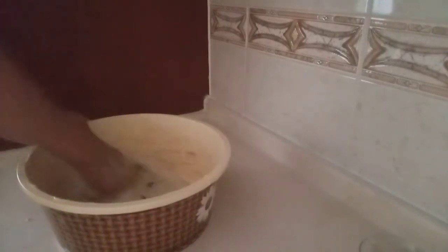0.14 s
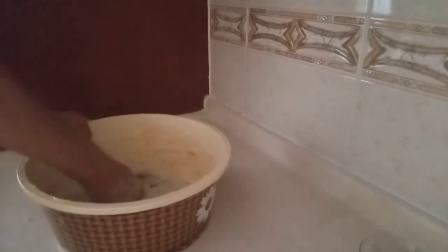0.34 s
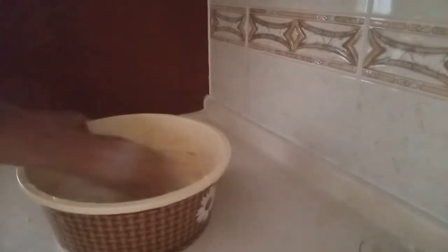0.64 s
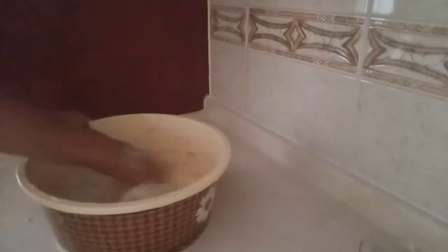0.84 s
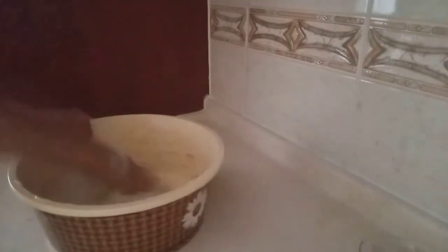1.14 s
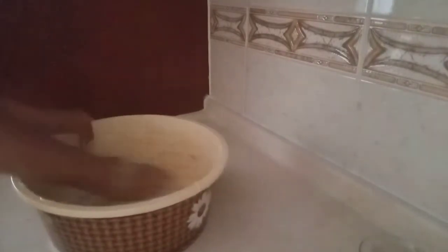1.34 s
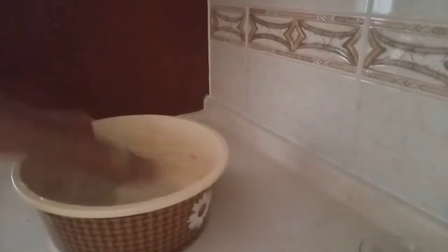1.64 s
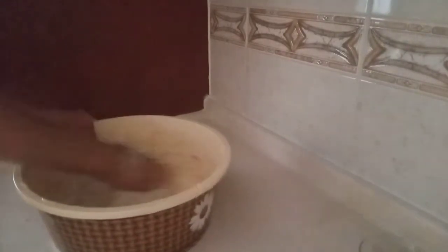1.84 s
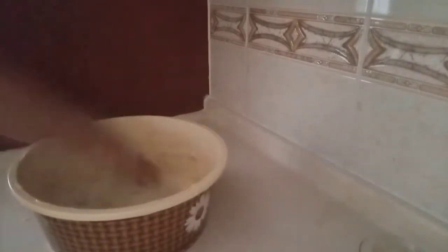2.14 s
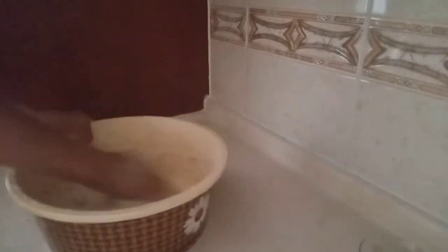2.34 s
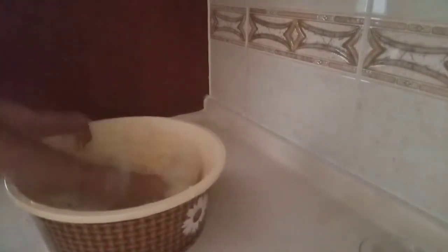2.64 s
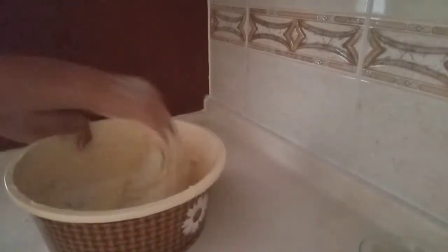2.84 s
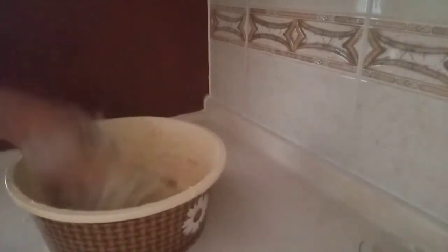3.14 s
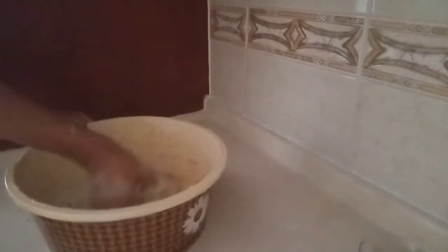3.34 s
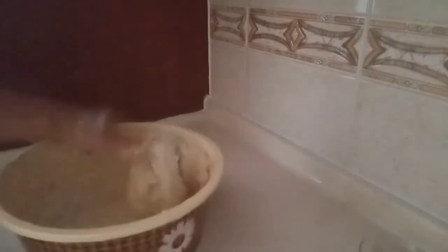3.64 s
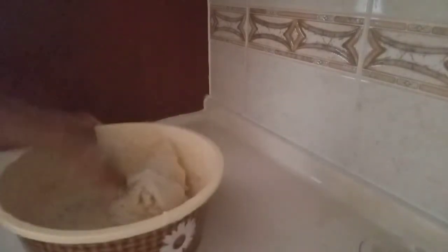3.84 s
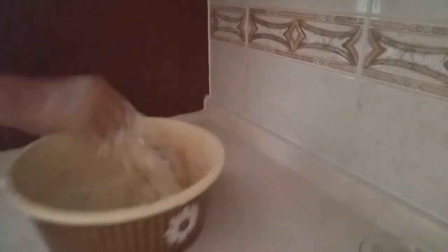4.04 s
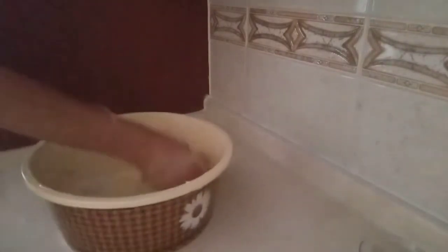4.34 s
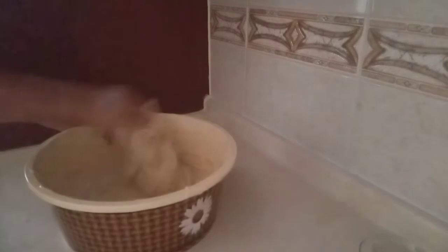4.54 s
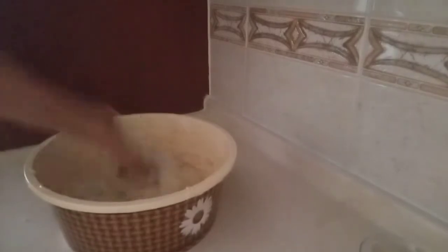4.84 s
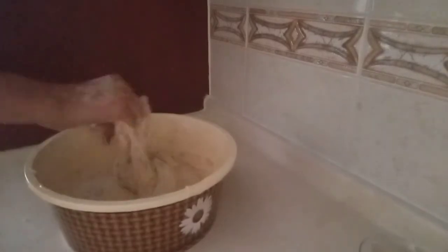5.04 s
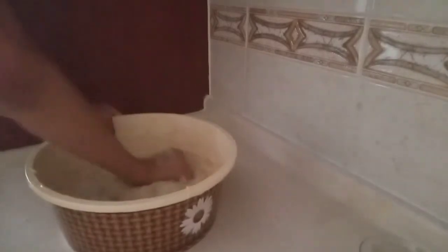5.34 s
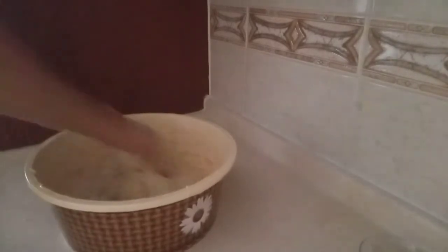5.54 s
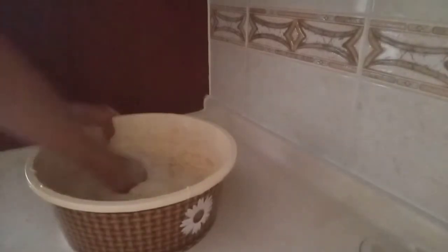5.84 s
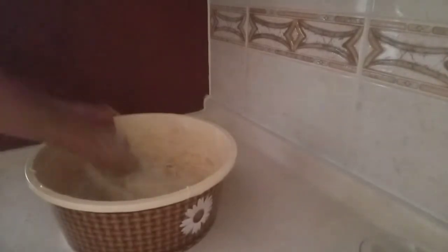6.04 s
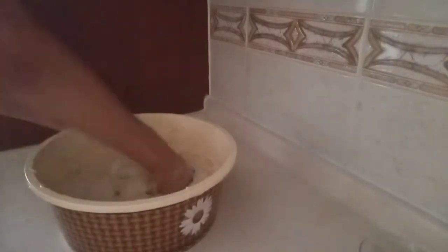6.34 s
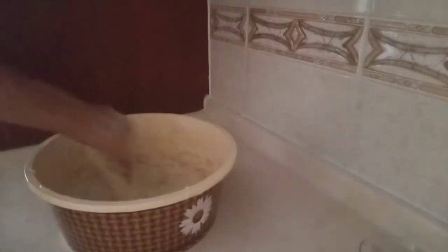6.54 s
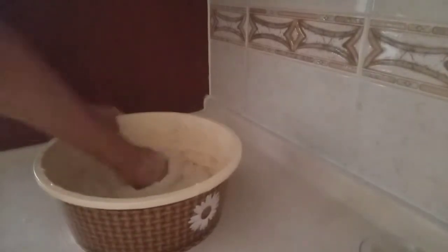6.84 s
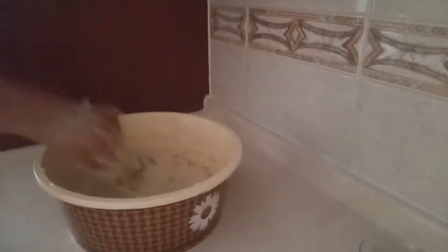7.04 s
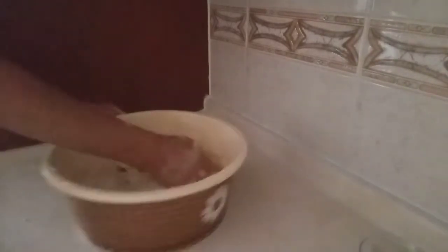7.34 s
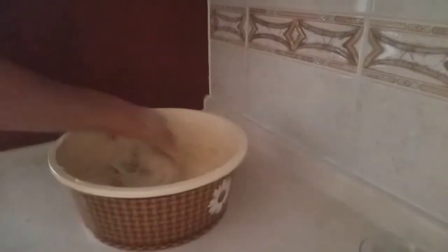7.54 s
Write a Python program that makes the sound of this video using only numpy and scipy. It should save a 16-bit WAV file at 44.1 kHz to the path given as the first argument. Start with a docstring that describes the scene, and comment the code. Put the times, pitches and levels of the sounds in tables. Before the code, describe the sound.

A hand kneads sticky dough in a plastic bowl on a kitchen counter. Presses make low, dull thuds and slaps knock hollowly on the bowl at an uneven pace, with soft, tacky rasping between them. One loud slap comes just after the start and the loudest near the middle, then the work goes on more gently. The microphone is a step away, and the quiet tiled room rings briefly.

```python
"""Kneading dough in a plastic bowl

A hand slaps, presses and drags sticky dough in a bowl on a kitchen counter, a step from a phone.
Dough rasps along the plastic, presses thud through the counter, slaps ring the wall, and the wall
judders as the lump peels off. The tiled kitchen rings briefly over a quiet floor and a few faint hisses."""
import sys
import numpy as np
from scipy import signal
from scipy.fft import rfft, irfft, next_fast_len
from scipy.io import wavfile
from scipy.ndimage import uniform_filter1d

SR = 44100
rng = np.random.default_rng(int(sys.argv[2]) if len(sys.argv) > 2 else 0)


def output_pcm(signal):
    """Save a mono or channel-first signal as 16-bit PCM at the path in sys.argv[1].

    Samples are clipped to [-1, 1] before scaling.
    """
    pcm = np.clip(np.atleast_2d(signal).T, -1, 1) * 32767
    wavfile.write(sys.argv[1], SR, np.round(pcm).astype(np.int16))


N = 339129


def undb(db):
    """Gain of a level in dB."""
    return 10 ** (np.asarray(db) / 20)


def unit(x):
    """Scales x to rms 1."""
    return x / np.sqrt(np.mean(x ** 2))


def eq(x, points):
    """Shapes x by (freq_hz, gain_db) points joined on a log-frequency axis."""
    size = next_fast_len(len(x) + 4096)
    hz, db = np.transpose(points)
    bins_hz = np.arange(size // 2 + 1) * SR / size
    gain = undb(np.interp(np.log(bins_hz + 1), np.log(hz), db))
    return irfft(rfft(x, size) * gain, size)[:len(x)]


def wander(rate_hz):
    """Smooth random modulation at rms 1."""
    hold = int(SR / rate_hz)
    steps = np.repeat(rng.standard_normal(N // hold + 1), hold)
    return unit(uniform_filter1d(uniform_filter1d(steps, hold), hold)[:N])


def ring(modes, extra_db):
    """Decaying sines of tapped (pitch_hz, level_db, t60_s) modes, each raised by extra_db."""
    hz, db, t60 = np.transpose(modes)[:, :, None]
    t = np.arange(SR // 3) / SR
    partials = np.sin(2 * np.pi * hz * t) * np.exp(-np.log(1000) * t / t60) * (1 - 3 * t)
    return undb(db[:, 0] + extra_db) @ partials


def focus_db(hz, centre_hz, db_per_octave):
    """Modes far from the struck centre ring less."""
    return -db_per_octave * np.abs(np.log2(hz / centre_hz))


def add(out, start_s, x, peak_db):
    """Mixes x in at start_s with the given peak."""
    i = int(max(start_s, 0) * SR)
    out[i:i + len(x)] += (x * undb(peak_db) / np.abs(x).max())[:N - i]


def flicker(x, depth_db, rate_hz):
    """Splits x into half-octave bands whose levels waver independently."""
    edges_hz = 500 * 2 ** np.arange(0, 5.5, .5)
    band = np.digitize(np.arange(N // 2 + 1) * SR / N, edges_hz)
    spectrum = rfft(x)
    return sum(irfft(spectrum * (band == k), N) * undb(depth_db * wander(rate_hz))
               for k in range(len(edges_hz) + 1))


def rough_notes(rows, width_hz, harmonics):
    """Short notes whose harmonics are each smeared over a band."""
    out = np.zeros(N)
    blurs = [(1 + wander(width_hz)) / (k + 1) for k in range(harmonics)]
    for start_s, length_s, pitch_hz, level_db in rows:
        i, size = int(start_s * SR), int(length_s * SR)
        phase = 2 * np.pi * pitch_hz * np.arange(size) / SR
        note = sum(np.sin((k + 1) * phase) * blur[i:i + size] for k, blur in enumerate(blurs))
        out[i:i + size] += undb(level_db) * note * signal.windows.tukey(size, .2)
    return out


# Drags along the wall; weight leans on the bowl, sizzle is the wet film's treble:
# peak_s, level_db, swell_s, fade_s, weight_db, sizzle_db
STROKES = [(0.0, -52, .02, 0.076, 12.5, -9), (0.151, -66.5, 0.068, 0.26, 0.5, -7.5),
           (0.239, -58.5, 0.015, 0.13, 3, 0), (0.444, -57.5, 0.081, 0.21, 2.5, 0.5),
           (0.917, -50, 0.17, 0.085, 0.5, -7), (1.091, -51.5, 0.05, 0.15, -1, -15),
           (1.197, -51, 0.14, 0.052, -22, 0.5), (1.34, -49.5, 0.08, 0.15, 2, -5),
           (1.588, -48, 0.026, 0.092, 13.5, -11), (1.683, -50, 0.082, 0.081, -15, 0),
           (1.833, -51, 0.046, 0.085, 5.5, -6), (1.943, -51.5, 0.15, 0.085, 1.5, -5),
           (2.083, -41, 0.011, 0.11, 5, -25), (2.18, -54, 0.11, 0.086, -12, 11),
           (2.37, -46.5, 0.044, 0.1, 5.5, 1), (2.619, -48, 0.025, 0.079, 5.5, -6.5),
           (3.12, -76, 0.54, 0.7, -1, 4.5), (3.363, -58, 0.19, 0.66, 0.5, -3),
           (3.598, -45, 0.041, 0.12, -17, -26), (3.716, -53.5, 0.018, 0.094, 26, -27),
           (4.053, -52.5, 0.24, 0.081, 1.5, -5), (4.205, -55.5, 0.024, 0.13, 2.5, 1),
           (4.3, -51.5, 0.12, 0.23, -7.5, -9), (4.525, -63, 0.12, 0.047, -11.5, -6),
           (4.689, -57, 0.14, 0.19, 7, -7.5), (4.86, -62, 0.023, .05, -13.5, 9.5),
           (4.915, -67.5, 0.05, 0.07, -11, 15.5), (5.276, -58.5, 0.02, 0.17, 0, 9),
           (5.507, -64, 0.14, 0.18, 3, 2.5), (5.778, -68, 0.056, 0.16, 7, 0),
           (6.011, -56, 0.061, 0.081, 5.5, 4.5), (6.254, -55.5, 0.026, 0.083, 10, -2.5),
           (6.31, -58.5, 0.13, 0.18, 2, 6), (6.485, -61, 0.048, 0.055, -12, 12),
           (6.727, -58.5, 0.011, 0.077, 1.5, -1), (6.809, -47, 0.035, 0.11, 2.5, -1),
           (6.982, -54, 0.059, 0.044, -12, 7), (7.104, -66.5, 0.06, 0.11, -2.5, -3),
           (7.284, -58, .03, 0.18, 15.5, -21.5), (7.37, -51, 0.067, 0.22, -8.5, -6.5),
           (7.6, -65, 0.21, 0.06, -2, -9.5)]


def stroke_curves():
    """Level, weight and sizzle in dB: strokes swell, fade and add up, the louder setting the colour."""
    span_db, swell_curve, fade_curve = 20, 1.43, 1.08  # curves above 1 round the top
    peak_s, level_db, swell_s, fade_s, *colours = np.transpose(STROKES)[:, :, None]
    t = np.arange(0, N, 32) / SR
    rising = t < peak_s
    distance = np.abs(t - peak_s) / np.where(rising, swell_s, fade_s)
    drop_db = span_db * distance ** np.where(rising, swell_curve, fade_curve)
    power = undb(np.maximum(level_db - drop_db, -200)) ** 2
    total = power.sum(axis=0)
    curves = [10 * np.log10(total)] + [(power * c).sum(axis=0) / total for c in colours]
    return (np.interp(np.arange(N) / SR, t, c) for c in curves)


def rub(resonance, rate_hz):
    """Uneven friction noise keeps a body ringing."""
    friction = rng.standard_normal(N) * undb(4 * wander(rate_hz))
    return unit(signal.fftconvolve(friction, resonance)[:N])


# Tone of dough tearing off plastic: freq_hz, gain_db
RASP_EQ = [(180, -22), (300, -14), (658, -4), (975, -7.5), (1970, -9.5), (4120, -17), (6300, -32.5),
           (8700, -24), (10600, -36), (13800, -37), (15500, -41)]


def dough_drag():
    """Sticky strands tear in dense ticks; the same rubbing shakes bowl and counter."""
    pops_per_s, pop_db = 130, 14  # trapped air bursting out of the dough
    level_db, weight_db, sizzle_db = stroke_curves()
    ticks = rng.standard_normal(N) * undb(2 * np.minimum(rng.exponential(size=N), 5) + 1.9 * wander(32))
    ticks *= np.where(rng.random(N) < pops_per_s / SR, undb(pop_db), 1)
    rasp = unit(flicker(eq(ticks, RASP_EQ), depth_db=2.5, rate_hz=25))
    sizzle = eq(rasp, [(2500, -33), (4500, -6)])
    rasp += (undb(sizzle_db) - 1) * sizzle
    tilt_db = -8 * np.log2(np.array(WALL_MODES)[:, 0] / 400)
    wall = undb(weight_db) * rub(ring(WALL_MODES, tilt_db), rate_hz=60)
    counter = undb(0.48 * weight_db - 0.5) * rub(ring(COUNTER_MODES, 0), rate_hz=30)
    return undb(level_db) * (undb(4.5) * rasp + wall + counter)


# Low ring of the counter and bowl bottom: pitch_hz, level_db, t60_s
COUNTER_MODES = [(77, 7.5, 0.18), (114, 8, 0.15), (175, 11, 0.085), (263, 8.5, 0.1)]
# Presses of the palm: start_s, level_db, centre_hz
PRESSES = [(0.018, -29.5, 114), (0.147, -29, 98), (0.291, -18, 184), (0.763, -36, 114), (0.944, -39, 116),
           (1.091, -32, 80), (1.363, -25, 163), (1.58, -21, 82), (1.826, -27, 120), (1.945, -30, 103),
           (2.091, -21, 76), (2.32, -37, 124), (2.421, -36.5, 175), (2.616, -30, 76), (3.149, -45, 113.6),
           (3.22, -28.5, 175), (3.577, -13.5, 188), (3.718, -21.5, 127), (4.226, -25.5, 127),
           (4.668, -32.5, 99), (4.697, -28.5, 96.9), (4.779, -35, 120.6), (5.292, -35.5, 89),
           (5.34, -31.5, 115.7), (5.418, -26.5, 123.4), (5.772, -35, 112.2), (5.925, -28.5, 125.6),
           (6.007, -33.5, 76), (6.253, -28, 181), (6.403, -31.5, 113), (6.746, -24, 174), (6.856, -28, 114),
           (7.262, -24.5, 138)]


def counter_thuds():
    """A soft push of the palm sets the counter's low modes going; longer pushes thud deeper."""
    out, hz = np.zeros(N), np.array(COUNTER_MODES)[:, 0]
    for start_s, level_db, centre_hz in PRESSES:
        cycles = np.arange(int(1.45 * SR / centre_hz)) * centre_hz / SR
        push = np.hanning(len(cycles)) * np.sin(2 * np.pi * (cycles + rng.random()))
        # the bowl sits loosely, so pitch and decay vary
        modes = COUNTER_MODES * (1 + [.05, 0, .2] * rng.uniform(-1, 1, (len(hz), 3)))
        boom = ring(modes, focus_db(hz, centre_hz, db_per_octave=3.7))
        add(out, start_s, signal.fftconvolve(push, boom), level_db - 2)
    return out


# Ring of the plastic wall: pitch_hz, level_db, t60_s
WALL_MODES = [(362.5, 2.5, 0.051), (413, 2.5, 0.2), (520, 11, 0.023), (607, 8.5, 0.07), (710, 8, 0.07),
              (913, 6.5, 0.12), (1080, 1, 0.081), (1169, 7, 0.1), (1623, 5.5, 0.0098), (2026, 14, 0.035),
              (2324, 15, 0.025)]
# Clack of the wall's crowded upper modes: freq_hz, gain_db
CLACK_EQ = [(900, -8), (1400, -4), (2300, -3), (3200, -12.5), (5000, -41.5)]
# Bright smack of the wet surface: freq_hz, gain_db
SMACK_EQ = [(2500, -19), (3800, 5.5), (6300, -12), (8500, -5), (10500, -22), (15000, -24.5)]
# Slaps and knocks on the bowl; upper ring and smack are relative to the level:
# start_s, level_db, centre_hz, upper_db, smack_db, contact_ms
SLAPS = [(0.106, -36, 607, -33, -47, 4.8), (0.236, -46.5, 536, 1, -20, 8.2),
         (0.287, -32.5, 510, -6.5, -25, 31), (0.301, -8, 643, -17.5, -48, 9),
         (0.753, -23, 960, -13, -34, 9.2), (0.946, -33.5, 337, -33, -46, 4),
         (1.088, -24.5, 413, -17.5, -43, 5.7), (1.113, -25.5, 560, -32, -48, 2.8),
         (1.132, -42, 568, 6, -24, 6.5), (1.369, -23, 520, -26, -56, 12), (1.58, -26, 734, -7.5, -29, 6.6),
         (2.088, -13, 710, -11, -36, 10.7), (2.318, -36.5, 900, 6, -11, 8),
         (2.323, -33.5, 720, 16, -6.5, 12), (2.42, -25, 670, -11, -54, 1.95),
         (2.612, -29.5, 354, -13.5, -57, 24), (2.983, -49, 592, -19, -33, 2.5),
         (3.226, -35, 315, -10.5, -44.5, 12.6), (3.239, -28.5, 368, -9, -33, 5.6),
         (3.575, -4, 850, -9.5, -44.5, 17), (3.628, -17.5, 423, -9.5, -53, 11.5),
         (3.652, -17, 970, -23, -52, 12), (3.706, -21, 860, -33, -40, 10), (4.224, -32, 320, -24, -44, 2.9),
         (4.235, -35, 465, 0.5, -27.5, 3.3), (4.621, -39, 520, -9, -59.5, 4.2),
         (4.712, -32, 452, -26.5, -44, 4.4), (4.737, -36, 729, -4, -5, 12.8),
         (5.42, -30, 420, -34, -43, 6.4), (5.771, -39.5, 552, -34.5, -35, 5.5),
         (5.925, -41, 403, -24, -50, 10.7), (6.249, -37.5, 447.5, -15, -36.5, 3.9),
         (6.469, -53.5, 2010, -0.5, -15, 6), (6.86, -35, 455, -21, -39, 4.2),
         (7.264, -32.5, 328, -17, -43.5, 5.5), (7.303, -24, 820, -2.5, -25.5, 10.5)]


def bowl_slaps():
    """A brief, ragged contact rings the wall; the wet surface smacks on top."""
    out, wall = np.zeros(N), np.array(WALL_MODES)
    lead_s, attack_s = .004, .0018  # the silent lead lets the filters start softly
    t = np.maximum(np.arange(SR // 8) / SR - lead_s, 0)
    low = wall[:, 0] < 1300
    for start_s, level_db, centre_hz, upper_db, smack_db, contact_ms in SLAPS:
        envelope = np.exp(-t * 1000 / contact_ms) * np.clip(t / attack_s, 0, 1)
        contact = rng.standard_normal(len(t)) * envelope
        # the hand bends the wall, detuning the modes; each blow lands elsewhere, rebalancing them
        modes = wall * (1 + .02 * rng.standard_normal((len(wall), 1)) * [1, 0, 0])
        modes[:, 1] += 3 * rng.standard_normal(len(wall))
        low_ring = ring(modes[low], focus_db(wall[low, 0], centre_hz, db_per_octave=8.7))
        high_ring = ring(modes[~low], 0)
        body_eq = [(centre_hz / 3, -25), (centre_hz, 0), (centre_hz * 3, -22), (centre_hz * 9, -70)]
        layers = [(signal.fftconvolve(contact, low_ring), -10),
                  (eq(contact, body_eq), 0),
                  (signal.fftconvolve(contact, high_ring), upper_db - 6),
                  (eq(contact, CLACK_EQ), upper_db + 4),
                  (eq(contact, SMACK_EQ), smack_db + 11.5)]
        for layer, trim_db in layers:
            add(out, start_s - lead_s, layer, level_db + trim_db)
    return out


# Wisps of treble: start_s, length_s, pitch_hz, level_db
HISSES = [(2.91, .1, 5650, -84), (2.985, .15, 6250, -85), (6.13, .12, 5850, -80)]


def faint_hisses():
    """Thin high tones, blurred into narrow hiss."""
    return rough_notes(HISSES, width_hz=900, harmonics=1)


# Short buzzes of the wall: start_s, length_s, pitch_hz, level_db
JUDDERS = [(3.944, 0.038, 375.5, -48), (4.04, 0.077, 387, -55), (6.468, .05, 401, -58)]


def wall_judders():
    """The wall judders on its low note while the lump peels off."""
    return rough_notes(JUDDERS, width_hz=150, harmonics=4)


# Reverb bands of the tiled room: freq_hz, t60_s, level_db
REVERB_BANDS = [(96.9, 0.4, -26), (403, 0.33, -18.5), (1131, 0.39, -20), (2900, 0.3, -17),
                (6000, 0.22, -21.5)]


def kitchen_reverb(x):
    """Echoes off the tiles build within about a millisecond and die away, the treble first."""
    t = np.arange(int(.7 * SR)) / SR
    tail = 0
    for hz, t60_s, level_db in REVERB_BANDS:
        band = eq(rng.standard_normal(len(t)), [(hz / 3, -30), (hz / 1.14, 0), (hz * 2.26, 0), (hz * 3, -30)])
        band *= np.exp(-np.log(1000) * t / t60_s) * np.clip(t / .0011, 0, 1)
        tail += undb(level_db) * band / np.sqrt(np.sum(band ** 2))
    return signal.fftconvolve(x, tail)[:N]


# Tone of the background: freq_hz, gain_db
FLOOR_EQ = [(25, 4), (106, 3), (427, -6.5), (604, -5.5), (2240, -22), (2500, -22), (3260, -17), (5570, -38),
            (15000, -42.5)]


def noise_floor():
    """A quiet, dark bed of noise whose level wavers."""
    return unit(eq(rng.standard_normal(N), FLOOR_EQ)) * undb(-67.5 + 2 * wander(9.9))


def scene():
    """The kneading and its reverb over the noise floor, in mono."""
    kneading = bowl_slaps() + counter_thuds() + dough_drag() + faint_hisses() + wall_judders()
    return (kneading + kitchen_reverb(kneading) + noise_floor())[None]


def record(dry):
    """The phone drops the deepest bass, rounds the loudest peak and cuts the top."""
    bottom_hz, top_hz, ceiling = 64, 15480, 1.1
    trimmed = signal.sosfilt(signal.butter(6, bottom_hz, "high", fs=SR, output="sos"), dry)
    rounded = np.tanh(trimmed / ceiling) * ceiling
    return signal.sosfilt(signal.ellip(10, .2, 70, top_hz, fs=SR, output="sos"), rounded)


dry = scene()
out = record(dry)
output_pcm(out)
```